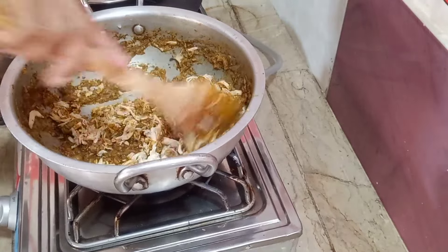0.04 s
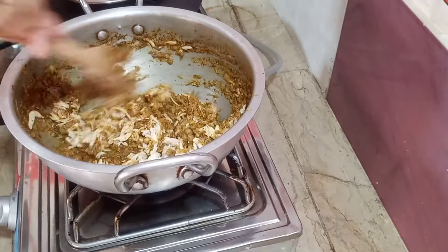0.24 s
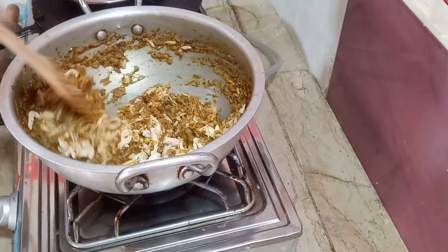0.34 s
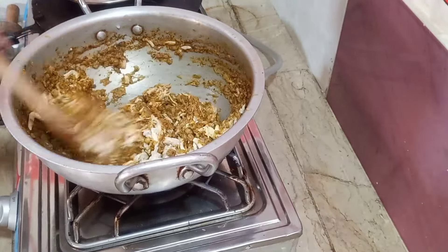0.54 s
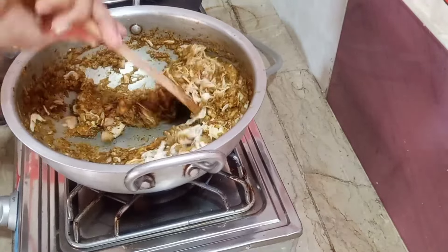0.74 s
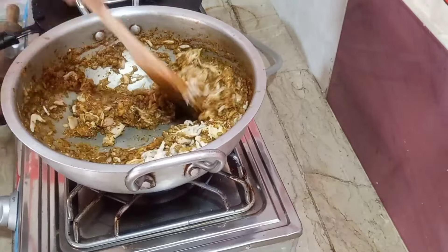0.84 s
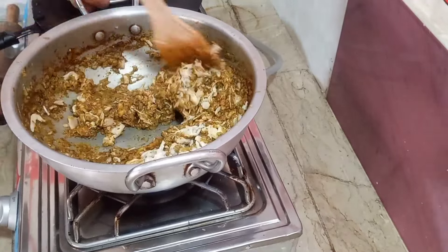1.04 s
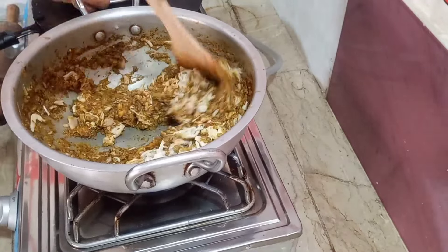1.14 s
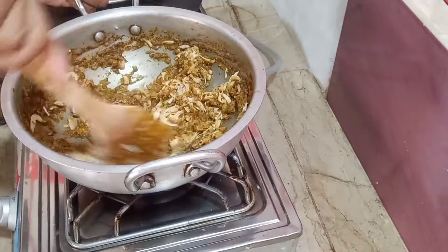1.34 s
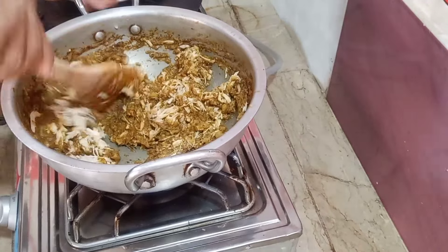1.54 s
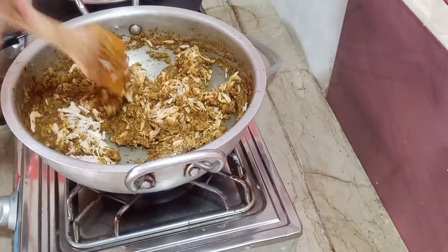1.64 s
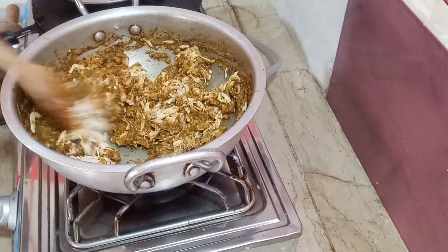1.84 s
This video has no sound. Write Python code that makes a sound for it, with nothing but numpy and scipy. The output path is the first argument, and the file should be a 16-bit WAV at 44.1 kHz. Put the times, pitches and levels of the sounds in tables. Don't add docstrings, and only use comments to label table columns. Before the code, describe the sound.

Close, fairly dry kitchen sound: sticky stirring makes a metal pan rumble and hiss, with sharp rattles and dull thumps in the first second, a brief pause with tiny wet ticks, then gentler scrapes above a quiet gas flame.

```python
import sys
import numpy as np
from scipy import signal
from scipy.fft import rfft, irfft, next_fast_len
from scipy.io import wavfile
from scipy.ndimage import uniform_filter1d

SR = 44100
rng = np.random.default_rng(int(sys.argv[2]) if len(sys.argv) > 2 else 0)


def amplitude_ratio(level_db):
    exponent = np.asarray(level_db, float) / 20
    return 10 ** exponent


def pcm_store(signal):
    levels = np.round(np.clip(np.atleast_2d(signal), -1, 1) * 32767)
    wavfile.write(sys.argv[1], SR, levels.astype(np.int16).T)


N = 83790
TIME = np.arange(N) / SR
FOOD_T60_S = .1


def rms_one(x):
    return x / np.sqrt(np.mean(x ** 2) + 1e-20)


def in_time(rows, silence_db=-95):
    s, db = np.transpose(rows)
    return amplitude_ratio(np.interp(TIME, s, db, silence_db, silence_db))


def drift(rate):
    r = np.exp(-80 * np.pi * rate / SR)
    noise = rng.standard_normal(N // 40 + 2002)
    slow = signal.lfilter([1], [1, -2 * r, r * r], noise)[2000:]
    return np.interp(np.arange(N) / 40, np.arange(len(slow)), rms_one(slow))


def ring(x, hz, t60):
    r, w = amplitude_ratio(-60 / (t60 * SR)), 2 * np.pi * hz / SR
    return signal.lfilter([0, np.sin(w)], [1, -2 * r * np.cos(w), r * r], x + 1e-18)


def body(x, modes, tilt_db=0):
    out = 0
    for k, (hz, db, t60) in enumerate(modes):
        gain = amplitude_ratio(db + tilt_db * np.log2(hz / 3000))
        out = out + (-1) ** k * gain * ring(x, hz, min(t60, FOOD_T60_S))
    return out


def colour(x, points):
    hz, db = np.transpose(points)
    log_hz = np.log(np.maximum(np.fft.rfftfreq(len(x), 1 / SR), 1))
    gain = amplitude_ratio(np.interp(log_hz, np.log(hz), db))
    return rms_one(irfft(rfft(x) * gain, len(x)))


def streaky(x, spread_db, per_s, width_hz):
    hz, _, z = signal.stft(x, SR, nperseg=512, noverlap=384)
    field = rng.standard_normal(z.shape)
    for _ in range(2):
        field = uniform_filter1d(field, max(int(width_hz / hz[1]), 1), axis=0)
        field = uniform_filter1d(field, max(int(SR / 128 / per_s), 1), axis=1)
    depth = np.clip(hz / 1500, .2, 1)[:, None]
    z = z * amplitude_ratio(spread_db * rms_one(field) * depth)
    return rms_one(signal.istft(z, SR, nperseg=512, noverlap=384)[1][:N])


def grains(per_s, spread_db):
    size = amplitude_ratio(spread_db * np.minimum(rng.exponential(1, N), 5)) * rng.choice([-1, 1], N)
    return size * (rng.random(N) < per_s / SR)


def swell(t, rise, fall):
    t = np.maximum(t, 0)
    return (1 - np.exp(-t / rise)) * np.exp(-t / fall)


# (pitch [Hz], level [dB])
RIM = [(1430, -4), (1860, -2.5), (2036, 1), (2600, 0.5), (2810, -1.5), (3570, -4.5), (4000, -0.5),
       (4250, 2.5), (4600, -1.5), (5000, -1), (5330, -3), (5790, 1.4), (6450, -1), (7300, -5.5)]


def rim(x, tilt_db=0):
    return body(x, [(hz, db, .014) for hz, db in RIM], tilt_db)


# (time [s], level [dB])
DRAG = [(.14, -82), (.18, -56), (.26, -38.5), (.31, -45.5), (.44, -43.5), (.58, -49), (.655, -37.5),
        (.71, -52), (.86, -40.5), (.97, -49.5), (1.05, -50.5), (1.12, -96), (1.215, -73), (1.235, -53),
        (1.4, -49.5), (1.53, -45.5), (1.66, -56.5), (1.8, -81.5)]
# (pitch [Hz], level [dB], time to die away [s])
BOWL = [(91, -40, 0.13), (123, -21.5, 0.15), (179.5, -13.5, 0.051), (250.6, -3.5, 0.12), (261, -1, 0.065),
        (321.7, -2, 0.1), (364.7, -1.75, 0.06), (435, -5, 0.048), (560, -13, 0.075), (646, -13, 0.061),
        (773, -10, 0.047), (860, -16.5, 0.062), (980, -13.5, 0.045), (1103, -15, 0.03)]


def drag():
    slips = grains(per_s=900, spread_db=3) + .5 * rng.standard_normal(N)
    push = slips * amplitude_ratio(1.5 * drift(30))
    shake = amplitude_ratio(-23) * rim(push)
    for k, mode in enumerate(BOWL):
        wander = amplitude_ratio(1.5 * drift(8))
        shake = shake + (-1) ** k * body(push * wander, [mode])
    even_s, even_share = .03, .7
    power = uniform_filter1d(shake ** 2, int(even_s * SR)) + 1e-12
    even = rms_one(shake / power ** (even_share / 2))
    return even * in_time(DRAG) * amplitude_ratio(1)


# (time [s], level [dB])
SLIDE = [(.17, -73), (.2, -50.5), (.27, -52.5), (.37, -55.5), (.45, -54.5), (.55, -68), (.66, -62),
         (.71, -48.5), (.75, -50.5), (.82, -51.5), (.92, -69.5), (1.1, -70), (1.2, -59.5), (1.25, -55.5),
         (1.38, -52), (1.5, -48.5), (1.61, -51.5), (1.67, -64.5)]
# (pitch [Hz], level [dB per Hz])
EDGE = [(700, -54), (1200, -3), (3000, -3.5), (5150, 1.8), (6450, 6), (8500, 1), (13900, -8.5),
        (15000, -1.5)]


def edge():
    grit = grains(per_s=8000, spread_db=2.2) + rng.standard_normal(N)
    hiss = colour(grit, EDGE) + amplitude_ratio(-14.5) * jets(grit)
    hiss = streaky(hiss, spread_db=3.3, per_s=35, width_hz=200)
    low = signal.sosfiltfilt(signal.butter(2, 5000, fs=SR, output="sos"), hiss)
    speed = in_time(SLIDE)
    bite = (speed / amplitude_ratio(-52)) ** 1.1
    return (hiss - low + bite * low) * speed * amplitude_ratio(4)


# (time [s], rattle peak [dB], thump peak [dB], rattle length [s], brightness [dB per octave])
JOLTS = [(.189, -64, -32, 0.0021, -4), (0.205, -35.5, -44, 0.0064, -2), (.238, -51.5, -38.5, 0.015, -13),
         (.262, -51, -31, .005, -8), (0.327, -28.5, -52, 0.0053, -1), (0.339, -38.5, -23, 0.031, -7.5),
         (0.3943, -19.5, -22, 0.0044, 1), (0.434, -42, -31, 0.0056, -8.5),
         (0.508, -24, -26.5, 0.0029, -1.8), (0.527, -53, -27.5, 0.003, -13), (0.72, -52, -70, 0.028, -16),
         (0.736, -44, -53, 0.018, -14), (0.7537, -19, -19.5, 0.0039, 1.5), (0.802, -48, -41, 0.0031, 9),
         (0.828, -47, -30, 0.019, -1), (0.852, -28, -27.5, 0.01, .5), (0.879, -34.5, -51, 0.018, -6),
         (0.892, -51, -26.5, 0.012, -11.5), (0.936, -60, -36, 0.0059, 3), (0.994, -46, -28, 0.016, -5.7),
         (1.22, -55, -43, 0.0042, 1), (1.231, -70, -35, .005, -23.5), (1.291, -62, -32.5, .006, -4),
         (1.329, -67, -34.5, .005, -2), (1.411, -48, -58, 0.0089, 12), (1.447, -62, -36, 0.0061, 3),
         (1.514, -43, -42, 0.0063, 9), (1.542, -57, -37, .005, 5), (1.622, -66, -44, 0.004, -12.5),
         (1.64, -54, -40, 0.0066, -13)]
# (pitch [Hz], level [dB], time to die away [s])
SETTLE = [(185, -14, .06), (256, -5, .09), (325, -4, .1), (360, 0, .07), (440, -10, .06), (510, -15, .04),
          (660, -14, .04), (775, -5, .06), (975, -12, .04), (1168, -10, .04)]


def jolts():
    out, span = np.zeros(N + SR), int(.25 * SR)
    t = TIME[:span]
    chatter = rms_one(grains(9000, 2.5) + rng.standard_normal(N))
    rim_norm = np.std(rim(chatter))
    lag_s, contact_s = .0062, .0004
    contact = swell(t - lag_s, contact_s, contact_s)
    thump_norm = np.abs(body(contact, SETTLE)).max()
    spread = 2 * rng.standard_normal((40, len(SETTLE)))
    same_share = .8
    for (s, db, thump_db, length, tilt_db), changes_db in zip(JOLTS, spread):
        i = int(s * SR)
        own = chatter[i:i + span]
        first = np.sqrt(same_share) * chatter[:span] + np.sqrt(1 - same_share) * own
        burst = first * swell(t, .0007, length)
        burst = burst + amplitude_ratio(-15) * own * swell(t, .0035, .036)
        burst = burst * amplitude_ratio(db - 3.5)
        rattle = rim(burst, tilt_db) + amplitude_ratio(-11.5) * body(burst, BOWL[8:], tilt_db)
        crack = amplitude_ratio(-19.5 + 2 * tilt_db) * burst
        rattle = signal.lfilter(*signal.butter(3, 8200, fs=SR), rattle / rim_norm + crack)
        modes = [(hz, level + change, t60) for (hz, level, t60), change in zip(SETTLE, changes_db)]
        thump = body(contact, modes) / thump_norm
        out[i:i + span] += rattle + amplitude_ratio(thump_db - 3) * thump
    return out[:N]


# (pitch [Hz], level [dB], time to die away [s])
BLADE = [(255, -16, 0.08), (325, -12, .08), (436, -9, 0.1), (630, -7, 0.04), (730, -6, 0.05),
         (880, -3, 0.035), (1000, 1, 0.02), (1140, -1, 0.025), (1600, -2, 0.018), (1860, -3, 0.016),
         (2300, -4, 0.01), (3000, -1, 0.01), (3700, -2, 0.008), (5000, -1, 0.003)]


def knock():
    knock_s = .5943
    t = TIME - knock_s
    push_shape = swell(t, .00011, .0015) + amplitude_ratio(-10.5) * swell(t, .0016, .035)
    push = rng.standard_normal(N) * push_shape
    push[int(knock_s * SR)] += amplitude_ratio(15)
    out = body(push, BLADE)
    return amplitude_ratio(-20) * out / np.abs(out).max()


# (time [s], peak level [dB], pitch
# [Hz])
SNAPS = [(1.119, -53, 6300), (1.124, -42, 6000), (1.131, -48, 5500), (1.137, -50, 6100),
         (1.1425, -42, 5300), (1.158, -51, 4500), (1.175, -55, 5800), (1.222, -51, 6200),
         (1.235, -53, 6300), (1.247, -50, 6600), (1.415, -44, 2950), (.187, -49, 6200), (1.124, -49, 6900),
         (1.143, -47, 4600), (1.094, -54, 6000), (.738, -40, 1150), (.748, -37, 1200), (.758, -33, 1170),
         (.782, -38, 1170), (.792, -41, 1300)]


def snaps():
    out, length_s, cycles = np.zeros(N), .0012, 14
    for s, db, hz in SNAPS:
        puff = rng.standard_normal(N) * swell(TIME - s, length_s / 4, length_s)
        tick = ring(ring(puff, hz, cycles / hz), hz, cycles / hz)
        out += amplitude_ratio(db - 2.5) * tick / np.abs(tick).max()
    return out


# (time [s], length [s], pitch [Hz], level [dB])
SQUEAKS = [
    (1.02, .027, 4980, -66),
    (1.056, .07, 4930, -66),
    (1.088, .035, 5560, -68),
    (1.0, .065, 6500, -67),
    (0.04, 0.07, 3350, -69),
]


def squeaks():
    out, t60 = np.zeros(N), .025
    for s, length, hz, db in SQUEAKS:
        breath = rng.standard_normal(N)
        tone = rms_one(ring(ring(breath, hz, t60), hz, t60))
        out += amplitude_ratio(db) * tone * np.sin(np.pi * np.clip((TIME - s) / length, 0, 1)) ** .5
    return out


# (time [s], level [dB])
SHOVES = [(.228, -51), (.258, -43.5), (.338, -37.5), (.4, -61), (.45, -48), (.51, -52.5), (.6, -69),
          (.65, -53), (.765, -52), (.838, -74), (.92, -55), (1.0, -78), (1.24, -51.5), (1.275, -50),
          (1.31, -46), (1.35, -51), (1.42, -60), (1.455, -70), (1.62, -74), (1.7, -59)]
# (pitch [Hz], level [dB], time to die away [s])
STOVE = [(96, 0, .3), (124, -3, .15)]


def stove():
    def boom(push):
        return sum(amplitude_ratio(db) * ring(push, hz, t60) for hz, db, t60 in STOVE)

    contact_s, pushes = .002, 0
    for k, (s, db) in enumerate(SHOVES):
        pushes = pushes + (-1) ** k * amplitude_ratio(db) * swell(TIME - s, contact_s, contact_s)
    one_boom = boom(swell(TIME, contact_s, contact_s))
    return boom(pushes) / np.abs(one_boom).max()


# (pitch [Hz], width [Hz], level [dB])
JETS = [(1520, 160, -9), (2400, 260, -14), (3400, 200, -16), (5700, 600, -15), (6430, 450, -8),
        (11060, 500, -4), (12500, 900, -5), (15330, 300, -3), (14900, 900, -8), (10750, 300, -6)]
JET_GAINS_DB = [0.083, 4.2, 4.5, 0.06, 4.5, 0.1, .1, .1, 0.12, .1]


def jets(x):
    out = 0
    for (hz, width, db), gain_db in zip(JETS, JET_GAINS_DB):
        sos = signal.butter(2, [hz - width / 2, hz + width / 2], "band", fs=SR, output="sos")
        out = out + amplitude_ratio(db + gain_db) * rms_one(signal.sosfilt(sos, x)) * np.sqrt(width)
    return rms_one(out)


# (pitch [Hz], level [dB per Hz])
BURNER = [(25, -4), (90, -7.5), (300, -14.5), (900, -24.5), (2400, -18.5), (5300, -21.5), (9000, -17),
          (13900, -36)]


def burner():
    roar = streaky(colour(rng.standard_normal(N), BURNER), spread_db=4.5, per_s=37, width_hz=200)
    hiss = streaky(jets(rng.standard_normal(N)), spread_db=2, per_s=12, width_hz=200)
    fading = rms_one(ring(rng.standard_normal(N), 1576, .012)) * amplitude_ratio(-56 - 60 * TIME / .27)
    return amplitude_ratio(-65) * roar + amplitude_ratio(-57.5) * hiss + fading


def kitchen(x):
    t60, wall_cut_hz = .31, 3700
    size = next_fast_len(N + SR)
    w = 2 * np.pi * np.fft.rfftfreq(size)
    dull = 1 / (1 + 1j * w * SR / (2 * np.pi * wall_cut_hz))
    tail = 0
    for k, lag in enumerate(rng.uniform(.009, .03, 8)):
        loop = amplitude_ratio(-60 * lag / t60) * dull * np.exp(-1j * w * lag * SR)
        tail = tail + (-1) ** k * loop / (1 - loop)
    return irfft(rfft(x, size) * tail, size)[:N]


def scene():
    pan = drag() + edge() + jolts() + snaps() + squeaks() + knock() + stove()
    duck_s, duck_from_db, duck_share = .045, -27.5, .18
    r = np.exp(-1 / (duck_s * SR))
    level_db = 10 * np.log10(signal.lfilter([1 - r], [1, -r], pan ** 2) + 1e-12)
    duck = amplitude_ratio(-duck_share * np.maximum(level_db - duck_from_db, 0))
    return (pan + amplitude_ratio(-18) * kitchen(pan) + duck * burner())[None]


def band_limit(x):
    return signal.sosfilt(signal.butter(12, 16880, fs=SR, output="sos"), x)


def record(dry):
    mic = signal.sosfilt(signal.butter(3, 70, "high", fs=SR, output="sos"), dry)
    mix = signal.sosfilt(signal.ellip(14, .5, 90, 15490, fs=SR, output="sos"), mic)
    return band_limit(mix)


dry = scene()
out = record(dry)
pcm_store(out)
```